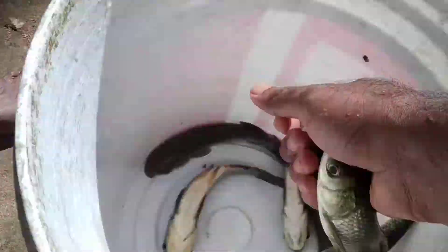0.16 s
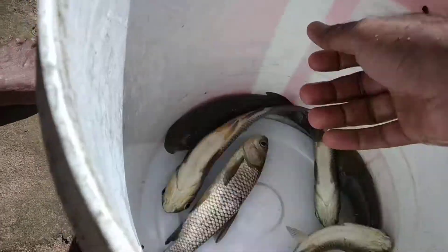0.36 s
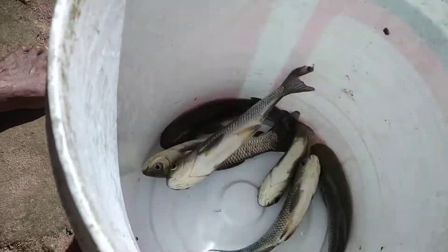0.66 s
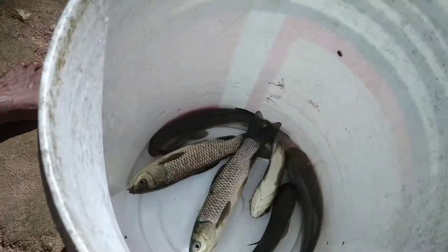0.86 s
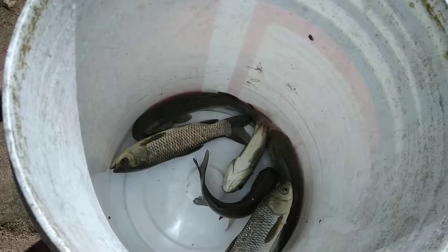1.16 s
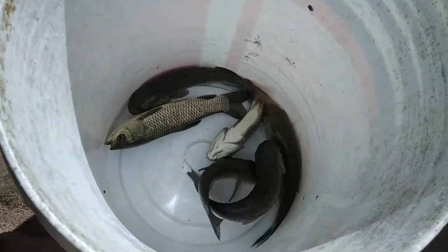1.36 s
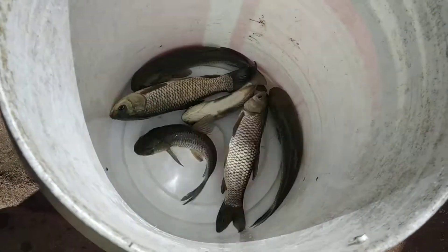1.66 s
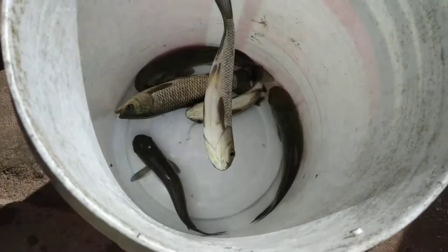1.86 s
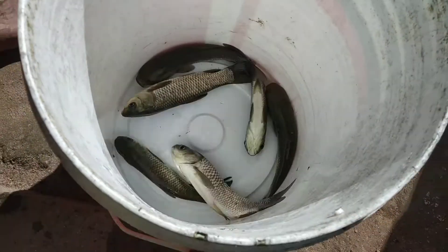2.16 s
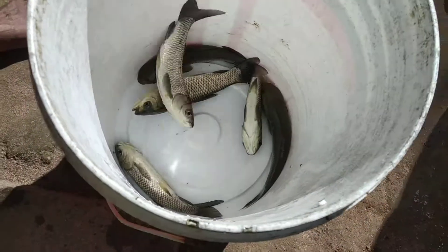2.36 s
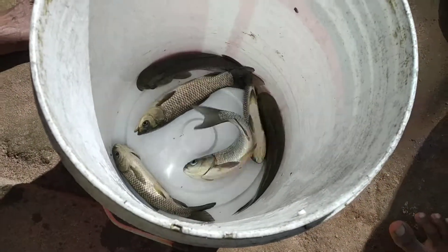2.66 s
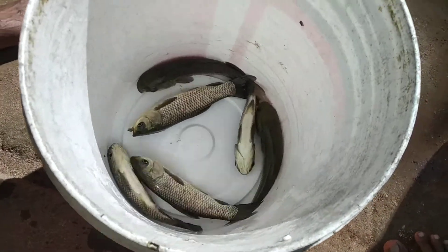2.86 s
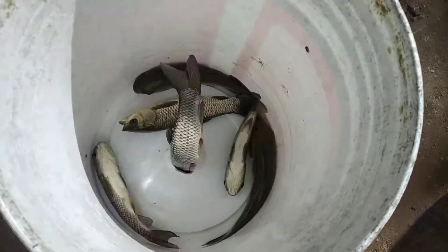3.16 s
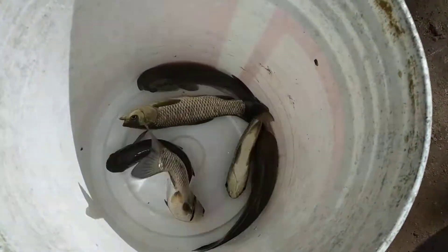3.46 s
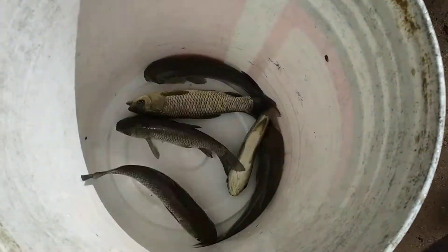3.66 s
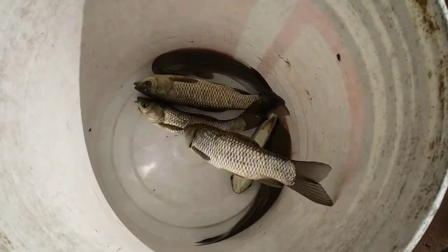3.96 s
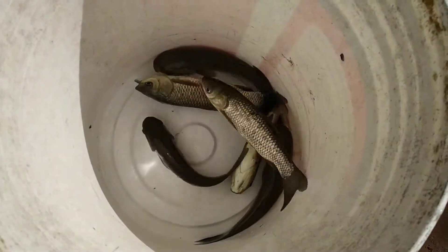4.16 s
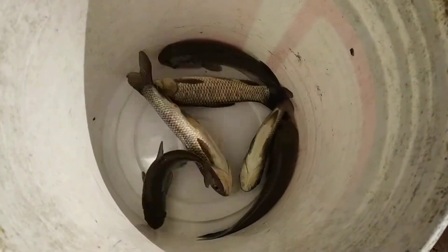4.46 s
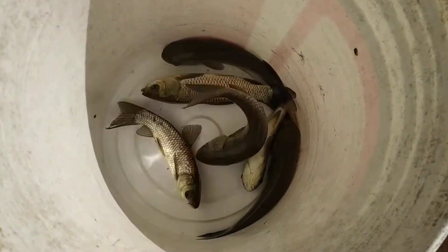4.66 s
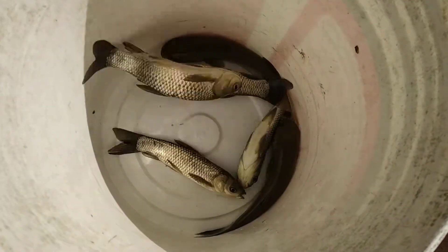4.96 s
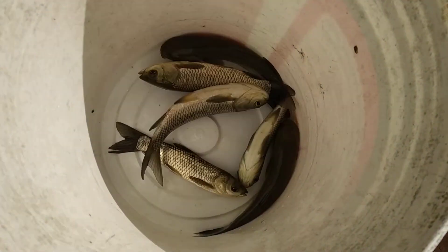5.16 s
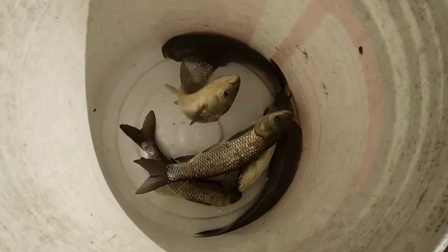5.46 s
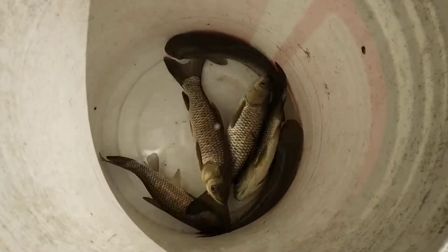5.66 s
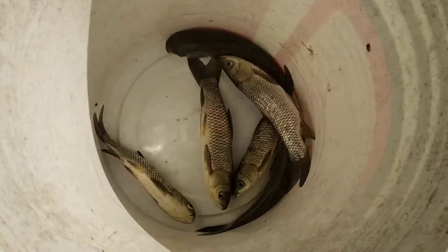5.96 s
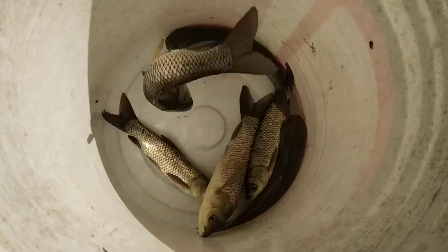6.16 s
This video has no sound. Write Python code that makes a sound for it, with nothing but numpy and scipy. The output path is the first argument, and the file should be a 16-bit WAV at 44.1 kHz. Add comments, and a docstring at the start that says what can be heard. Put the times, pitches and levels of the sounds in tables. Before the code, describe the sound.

Close stereo microphone over a plastic bucket outdoors. Several live fish flop without pause: low hollow thuds on the bottom, short knocks on the wall, crisp wet slaps and slithering squelches, in rapid uneven bursts. Early on the left side twice overloads with a heavy thump and briefly dulls. A small bird cheeps hoarsely far away about once a second over a soft low rumble.

```python
"""Fish flapping in a plastic bucket

Bodies thud on the bottom and ring the air in the bucket, both built from damped modes; raps set the wall ringing.
Wet tails and scales slap, slither and squelch on the wall: grainy shaped noise with banded pops and tiny damped
pops. A small bird cheeps far off, two swept sines heard through echoes, over a low outdoor rumble of shaped noise.
Early on the left microphone port is knocked into overload twice, sticking at its limit and sagging back.
"""
import sys
import numpy as np
from scipy import signal
from scipy.fft import rfft, irfft, next_fast_len
from scipy.io import wavfile
from scipy.ndimage import uniform_filter1d, map_coordinates

SR = 44100
rng = np.random.default_rng(int(sys.argv[2]) if len(sys.argv) > 2 else 0)


def to_wav(s):
    """Save 16-bit WAV."""
    ch = np.atleast_2d(s).T  # columns
    pcm = np.round(np.clip(ch, -1, 1) * 32767)  # PCM
    wavfile.write(sys.argv[1], SR, pcm.astype(np.int16))


N = 278697  # length in samples

# bodies landing on the bottom: t/s, air ring level/dB, bottom thud level/dB
LANDINGS = [(0.082, -28, -18.5), (0.0923, -10.5, -7.5), (0.1982, -11, -26), (0.28, -15, -12),
            (0.3014, -10, -27), (0.32, -15, -13), (0.3793, -10.5, -17.5), (0.4279, -15.5, -14.5),
            (0.4756, -18.5, -25), (0.5418, -18.5, -23), (0.6491, -17.5, -17), (0.7616, -16, -6.5),
            (0.779, -13.5, -10.5), (0.8586, -28, -27), (0.903, -26, -31), (0.9296, -23, -36),
            (1.15, -18.5, -44), (1.232, -13, -8), (1.3386, -23, -26), (1.4323, -18, -44), (1.538, -26, -18),
            (1.548, -22, -18), (1.571, -37, -20), (1.591, -9, -14.5), (1.668, -14.5, -27),
            (1.786, -25, -35), (1.951, -9, -12), (2.03, -2.5, -10), (2.0547, -32, -28), (2.0905, -5.5, -12),
            (2.171, -22, -24), (2.1941, -15, -16), (2.2201, -6.5, -14.5), (2.3707, -21.5, -32),
            (2.396, -22, -24), (2.4599, -1.5, -15.5), (2.641, -23, -27), (2.6919, -23, -21.5),
            (2.7929, -19, -39), (2.8172, -22.5, -34), (3.0463, -34, -29), (3.1606, -19, -25),
            (3.296, -20, -10), (3.349, -18, -15), (3.45, -12, -18), (3.5749, -6.5, -15), (3.702, -15, -21),
            (3.7788, -22, -28), (3.8227, -18.5, -41), (4.123, -30, -18), (4.1695, -22, -11.5),
            (4.239, -16.5, -43), (4.3695, -6, -10.5), (4.4376, -25, -21.5), (4.4687, -5.5, -21),
            (4.5754, -22, -22), (4.713, -10, -15), (4.787, -33, -14), (4.8331, -4, -8.5),
            (5.0279, -30, -14.5), (5.097, -20, -13), (5.184, -22, -14), (5.199, -16.5, -18),
            (5.258, -24, -22), (5.2956, -37, -20), (5.3264, -21, -27), (5.4482, -20.5, -17.5),
            (5.5117, -25, -20.5), (5.822, -28.5, -24), (6.0236, -21.5, -34), (6.1428, -19, -26),
            (6.2937, -7.5, -16)]
# colour of wet hiss: f/Hz, relative density/dB per Hz
HISS_COLOUR = [(3500, -26), (5000, -8.5), (6500, -2.5), (8800, 4), (10500, 0), (12000, -15), (14000, -25)]
# colour of the topmost wet sizzle: f/Hz, relative density/dB per Hz
SIZZLE_COLOUR = [(9500, -12), (11500, -0.5), (14000, -4), (16000, -9.5)]


def amp(db):
    """Decibels to a linear factor."""
    return np.exp(np.asarray(db) * float(np.log(10) / 20))


def unit(x):
    """x scaled to rms 1."""
    return x / np.sqrt(np.mean(x ** 2) + 1e-20)


def along(points, hz):
    """A curve through (Hz, value) points on a log frequency axis."""
    f, v = np.transpose(points)
    return np.interp(np.log(hz + 1), np.log(f + 1), v)


def wobble(rate):
    """A smooth random curve, rate knots a second."""
    return map_coordinates(rng.standard_normal(int(N * rate / SR) + 4), [np.arange(N) * rate / SR])


def filtered(x, response):
    """x with its spectrum times a complex response of frequency."""
    m = next_fast_len(N + SR // 2)
    return irfft(rfft(x, m) * response(np.fft.rfftfreq(m, 1 / SR)), m)[..., :N]


def rush(spectrum, grain_db=0, grain_rate=900, patchy_db=0):
    """Stereo noise of rms 1, alike in the bass; grains roughen both sides together, patches make its colour lumpy."""
    # likeness of the two sides: f/Hz, left-right correlation (below zero counts as unrelated)
    likeness = [(60, 0.92), (130, 1), (290, 0.9), (640, 0.69), (1410, -0.22), (3100, -0.21), (6820, -0.74),
                (15000, -0.42)]
    turn = lambda hz: np.arccos(np.clip(along(likeness, hz), 0, 1)) / 2
    closed = [(1, -120)] + list(spectrum) + [(SR / 2, -120)]  # fade out at both ends
    z = signal.stft(rng.standard_normal((2, N)), nperseg=256)[2]
    field = uniform_filter1d(rng.standard_normal(z.shape[1:]), size=4, axis=0)
    field = uniform_filter1d(field, size=5, axis=1)
    patchy = signal.istft(z * amp(patchy_db * unit(field)), nperseg=256)[1][:, :N]
    grainy = patchy * amp(grain_db * wobble(grain_rate))
    mid, side = filtered(grainy, lambda hz: amp(along(closed, hz)) * [np.cos(turn(hz)), np.sin(turn(hz))])
    return unit(np.array([mid + side, mid - side]))


def ring(modes, t, scatter_db, detune):
    """Damped modes, each at a new strength and slightly new pitch; the first swing is a rarefaction."""
    draw = rng.standard_normal((2, len(modes)))
    hz, db, t60 = np.transpose(modes)[:, :, None]
    hz = hz * (1 + detune * draw[0, :, None])
    level_db = np.float32(db + scatter_db * draw[1, :, None] - 60 * t / t60)
    phase = np.float32(2 * np.pi * hz * t)
    return -np.sum(amp(level_db) * np.sin(phase), axis=0)


def outdoors():
    """Low outdoor rumble: patchy noise, mostly bass, whose level drifts slowly."""
    # colour of the rumble: f/Hz, relative density/dB per Hz
    rumble_colour = [(15, -29), (28, -12), (42, -3), (50, 3.5), (62, -0.5), (95, -6), (220, -23),
                     (330, -24.5), (1100, -26.5), (3000, -33), (4500, -45.5), (6400, -40.5), (11000, -48),
                     (16000, -41)]
    level_db = -40 + wobble(2.24)
    return amp(level_db) * rush(rumble_colour, patchy_db=5.5)


def restless_db():
    """How much the fish wriggle, one value per sample."""
    # wriggling between the blows: t/s, restlessness/dB
    wriggling = [(0.0, -45), (0.37, -41.5), (1.09, -56.5), (1.44, -42.5), (1.95, -53), (2.16, -43.5),
                 (2.52, -53), (2.94, -54), (3.57, -56), (4.08, -55), (4.4, -52), (5.579, -45), (6.32, -48)]
    return np.interp(np.arange(N) / SR, *np.transpose(wriggling))


def squelch(count):
    """Tiny wet pops at random moments: a few damped cycles each, most of them faint."""
    when, pitch, size, side = rng.random((count, 4)).T[:, :, None]
    hz, t = 500 * 7 ** pitch, np.arange(400) / SR
    level_db = -7 * np.log(size + 0.025) - 6 * pitch - 23 * hz * t  # loses 23 dB a cycle
    pops = amp(level_db) * np.sin(2 * np.pi * hz * t) * np.clip(hz * t, 0, 1)
    at = ((when * N).astype(int) + np.arange(400)).ravel()
    shares = (1.0 + side, 1.3 - side)  # left, right
    return unit(np.array([np.bincount(at, (pops * share).ravel(), N + 400)[:N] for share in shares]))


def wriggle():
    """Scales slither, flanks rub and squelch on the wall and small movements keep the air in the bucket humming."""
    # colour of flanks rubbing the wall: f/Hz, relative density/dB per Hz
    rub_colour = [(250, -42), (400, -3), (740, -4), (765, 6.5), (800, -8.5), (1300, -8), (3000, -9.5),
                  (5000, -12.5)]
    # colour of the stirred air in the bucket: f/Hz, relative density/dB per Hz
    stir_colour = [(60, -36), (100, -12.5), (170, -17), (210, -11), (245, -20), (330, -53)]
    restless = restless_db()
    # slither, rubbing and stirred air all follow the same restlessness
    slither_db, rub_db, stir_db = restless - 1.5, restless - 1, restless + 9
    fidget = wobble(35)
    slither = rush(HISS_COLOUR, grain_db=4, grain_rate=400, patchy_db=3)
    slither = slither + 0.4 * rush(SIZZLE_COLOUR, grain_db=5, grain_rate=600, patchy_db=4)
    rub = rush(rub_colour, grain_db=-1.0, grain_rate=160, patchy_db=5.0) + 0.57 * squelch(count=700)
    stir = rush(stir_colour, grain_db=3.5, grain_rate=30)
    return amp(slither_db + 3.6 * fidget) * slither + amp(rub_db + 4.26 * fidget) * rub + amp(stir_db) * stir


def chance(count):
    """Rows (s, three normal draws) for faint contacts, denser while the fish are restless."""
    odds = np.cumsum(amp(restless_db()))
    when = np.interp(rng.random(count), odds / odds[-1], np.arange(N) / SR)
    return np.column_stack([when, rng.standard_normal((count, 3))])


def thuds():
    """Each landing first sucks at the air in the bucket and rings it; the bottom swings back a moment later."""
    # air in the bucket: f/Hz, level/dB, t60/s
    air_modes = [(210.1, -2.5, 0.22), (187, -9, 0.089), (240, -9, 0.03), (290, -28, 0.2),
                 (340.6, -30, 0.26)]
    # bottom on the ground: f/Hz, level/dB, t60/s
    bottom_modes = [(102.1, -1, 0.11), (129.8, -3.5, 0.1), (67, -21, 0.038)]
    nudge_db = -32.5  # faint chance bumps on the bottom
    out, t = np.zeros(N + SR), np.arange(SR // 4) / SR
    soft = 1 - np.exp(-t / 0.0022)  # flesh spreads the contact
    late = np.clip(t - 0.001, 0, None)
    nudges = [(s, nudge_db + 4 * a, nudge_db + 2.5 + 4 * b) for s, a, b, c in chance(count=14)]
    for s, air_db, thud_db in [*LANDINGS, *nudges]:
        air = amp(air_db) * ring(air_modes, t, 0.39, 0.0079)
        bottom = amp(thud_db) * ring(bottom_modes, late, 0.84, 0.1)
        out[round(s * SR):][:len(t)] += soft * (air - bottom)
    restless = amp(2.2 * wobble(45))  # moving fish keep disturbing the ring
    # deep bass below about 35 Hz rolls off
    trimmed = filtered(restless * out[:N], lambda hz: (1j * hz / (1j * hz + 35)) ** 2)
    apart = np.array([[0.00012], [-0.00012]])  # seconds; the ports sit a few centimetres apart
    return filtered(trimmed, lambda hz: np.exp(2j * np.pi * hz * apart)) * amp([[0.7], [-0.7]])


def raps():
    """The raps and a rattle on the wall after each landing as rows (s, dB, Hz)."""
    # heads, fins and tails rapping the wall: t/s, level/dB, f/Hz
    wall_raps = [(0.0936, -19, 730), (0.1982, -10, 1015), (0.2825, -21.5, 780), (0.3153, -19, 824),
                 (0.354, -21, 1090), (0.3801, -11, 890), (0.3888, -14.5, 780), (0.4316, -25, 814),
                 (0.6503, -22.5, 1250), (0.7699, -19, 830), (0.7911, -20, 700), (0.8007, -16.5, 800),
                 (0.9101, -20, 770), (1.2321, -17, 685), (1.238, -15.5, 750), (1.4357, -14, 1050),
                 (1.5919, -23, 860), (1.635, -20.5, 746), (1.6501, -23, 1160), (1.9448, -22, 895),
                 (1.9528, -23, 800), (2.0291, -7.5, 845), (2.0571, -25, 820), (2.0888, -25, 840),
                 (2.0969, -20.5, 706), (2.1128, -25, 670), (2.1405, -30, 790), (2.2194, -25.5, 660),
                 (2.2477, -21.5, 970), (2.2545, -20, 1070), (2.3895, -21.5, 1250), (2.4167, -23.5, 790),
                 (2.4604, -12.5, 1100), (2.8011, -21, 1000), (3.2956, -20, 1470), (3.3483, -21.5, 630),
                 (3.3736, -22, 654), (3.5755, -19, 590), (3.7131, -14, 720), (3.7558, -22, 750),
                 (3.988, -22, 726), (4.116, -22.5, 1410), (4.1715, -21, 1210), (4.2333, -19, 1200),
                 (4.3708, -5, 723), (4.4676, -12, 620), (4.5663, -20.5, 680), (4.705, -28, 625),
                 (4.8111, -17, 970), (4.8331, -13, 630), (5.2, -16.5, 684), (5.8109, -17.5, 600),
                 (5.8709, -26.5, 1170), (6.1436, -15.5, 700), (6.2603, -18, 1170), (6.2872, -10.5, 660)]
    delay_s, spread_s, under_db, rattle_hz = 0.01, 0.015, 22, 760  # under the louder part of the landing
    draw = rng.random((len(LANDINGS), 2))
    rattles = [(s + delay_s + spread_s * a, max(air, thud) - under_db, rattle_hz * 1.54 ** (b - 0.5))
               for (s, air, thud), (a, b) in zip(LANDINGS, draw) if s + delay_s + spread_s < N / SR]
    return [*wall_raps, *rattles]


def knocks():
    """A short rap at its own pitch sets the wall ringing; each port hears the wall a little differently."""
    # plastic wall: f/Hz, level/dB, t60/s
    wall_modes = [(365.5, -23, 0.12), (554.3, -23, 0.12), (645, -13, 0.035), (761, -26, 0.25),
                  (798, -32.5, 0.17), (942, -18.5, 0.039), (1232, -23.5, 0.078), (1707, -20, 0.02),
                  (2060, -25, 0.053)]
    out, t = np.zeros((2, N + SR)), np.arange(SR // 7) / SR
    contact = 1 - np.exp(-t / 0.00083)
    for s, db, hz in raps():
        shared = ring([(hz, 1.5, 0.014)], t, 0.6, 0.03) + ring(wall_modes, t, 3, 0.012)
        ports = np.array([shared + 0.8 * ring(wall_modes, t, 6.4, 0.0576) for port in range(2)])
        out[:, round(s * SR):][:, :len(t)] += amp(db) * contact * ports
    damping = amp(1.27 * wobble(60))  # fish against the wall damp it on and off
    return out[:, :N] * amp([[0.8], [-0.8]]) * damping


def wet_contacts():
    """Slaps, slides and chance ticks as rows (s, hiss dB, smack dB, smack Hz, rise ms, fall ms)."""
    # wet slaps: t/s, hiss level/dB, smack level/dB, smack f/Hz, time to fall by 12 dB/ms
    slap_hits = [(0.1989, -21, -23, 1490, 11.5), (0.244, -14.5, -34, 3060, 10),
                 (0.2842, -8, -20.5, 4680, 5.5), (0.3394, -22, -32, 1500, 12),
                 (0.3712, -23, -31.5, 3290, 27), (0.4682, -13.5, -35.5, 1500, 3.5),
                 (0.5095, -27.5, -41, 1440, 7.5), (0.648, -28, -21, 1425, 9), (0.73, -28.5, -52, 1490, 6),
                 (0.7606, -24, -32, 1480, 3.5), (0.776, -26.5, -35, 1500, 10.5),
                 (0.9118, -8, -19, 5650, 1.15), (0.943, -17, -29, 5340, 2.7), (0.985, -32, -41, 4000, 3),
                 (1.149, -31, -36, 2500, 4), (1.2315, -14.5, -25, 1440, 6.4),
                 (1.2509, -9.5, -18, 4460, 4.5), (1.3869, -15, -31, 1490, 5.8),
                 (1.4342, -11, -18, 1500, 6.5), (1.4956, -20, -38, 5600, 5), (1.5048, -24, -47, 5490, 1),
                 (1.542, -20.5, -31, 2690, 2), (1.564, -34, -24.5, 2600, 6.5),
                 (1.6086, -21.5, -36, 3020, 2.5), (1.6513, -14.5, -24, 2630, 1.7),
                 (1.668, -24, -36, 1520, 4), (1.725, -29, -55, 4000, 1), (1.7785, -18.5, -39, 5360, 4.5),
                 (1.7881, -20, -31.5, 2460, 6), (1.9462, -20.5, -28, 1536, 9.1),
                 (2.0303, -29.5, -22, 1520, 2), (2.1377, -36, -29, 4680, 8.5),
                 (2.148, -24.5, -28.5, 5160, 6.5), (2.193, -29, -44, 1540, 12), (2.2448, -40, -26, 1570, 8),
                 (2.2556, -12, -19.5, 2180, 5), (2.3211, -18.5, -25, 4370, 4), (2.407, -25, -47, 4500, 5.5),
                 (2.5614, -28, -29.5, 2970, 5.5), (2.6577, -14.5, -34, 5340, 3),
                 (2.8035, -18, -27, 1480, 3), (2.86, -33.5, -46, 3980, 2), (3.049, -13.5, -35, 5020, 2),
                 (3.0964, -33, -50, 4260, 5), (3.1156, -23, -36, 5000, 2.5), (3.257, -30.5, -42, 4000, 4),
                 (3.2956, -30, -31.5, 1565, 17), (3.383, -16.5, -41, 5740, 4.1), (3.414, -17, -41, 5300, 5),
                 (3.5774, -26, -34, 1530, 3.5), (3.716, -8.5, -24.5, 2840, 1.3), (3.801, -31, -42, 4000, 3),
                 (3.8372, -26, -31, 4300, 5.5), (3.8516, -19.5, -29, 1505, 1.6),
                 (3.9916, -11.5, -28.5, 4310, 2.3), (4.144, -33, -44, 1500, 6), (4.1627, -28, -33, 1880, 8),
                 (4.1734, -21.5, -19, 1610, 6.5), (4.226, -15, -24.5, 3140, 2),
                 (4.2362, -17.5, -18, 1540, 1.6), (4.355, -32, -44, 3000, 5), (4.371, -25, -46, 1500, 1),
                 (4.3939, -25, -39, 1500, 6.5), (4.468, -41, -28.5, 1500, 6), (4.5672, -14, -25, 1520, 1.5),
                 (4.6317, -28.5, -43, 3000, 5), (4.734, -27, -39, 1500, 3), (4.7794, -34, -21.5, 3630, 2),
                 (4.812, -9.5, -28.5, 1470, 3.8), (4.833, -14, -22, 1480, 2.7),
                 (4.9521, -15, -25.5, 2100, 2), (5.0313, -16.5, -30, 1895, 5),
                 (5.2943, -13.5, -39, 1590, 1), (5.31, -19, -21, 1910, 4.3), (5.3546, -25, -40, 1590, 3),
                 (5.4482, -14.5, -50, 5300, 1.7), (5.526, -23.5, -38, 2090, 4.5),
                 (5.6963, -8.5, -27.5, 5740, 3), (5.7028, -10, -22.5, 5000, 2.3),
                 (5.827, -33, -42, 3020, 2), (5.8711, -24.5, -22.5, 1840, 7.5), (6.0263, -8, -28, 3800, 2),
                 (6.0343, -19, -28, 2090, 6.5), (6.0887, -17.5, -42, 2900, 2.9),
                 (6.1447, -10.5, -21.5, 5390, 3.5), (6.2611, -22, -27.5, 1375, 4.5),
                 (6.2918, -10.5, -22.5, 1500, 1.5)]
    # flanks sliding along the wall: t of the peak/s, hiss level/dB, time to swell and again to fade by 12 dB/ms
    slides = [(0.114, -27, 37), (0.179, -36, 11), (.323, -27, 8), (.38, -15.5, 19.5), (.595, -39.5, 20),
              (.687, -32, 11), (1.1634, -25, 11), (1.226, -33, 17), (1.3794, -17, 5.5), (1.684, -30.5, 19),
              (2.06, -32, 14), (2.086, -26, 12.5), (2.39, -30, 7), (2.648, -28, 10), (2.718, -24.5, 7.5),
              (2.789, -32, 6.5), (3.36, -29.5, 9.5), (3.391, -21.5, 13), (4.119, -30, 16), (4.416, -23, 12),
              (4.547, -33, 12), (4.724, -29.5, 6.5), (5.041, -24.5, 2), (5.285, -26, 12), (5.328, -30, 16),
              (5.548, -34, 11), (5.6284, -18, 5), (5.993, -26.5, 14)]
    rise_ms = 0.91  # slaps and ticks rise by 12 dB
    slide_smack_under_db, slide_smack_hz = 13, 1505
    tick_db, tick_ms = -41, 4  # faint wet ticks on the wall
    hits = [(s, hiss, smack, hz, rise_ms, ms) for s, hiss, smack, hz, ms in slap_hits]
    strokes = [(s, hiss, hiss - slide_smack_under_db, slide_smack_hz, ms, ms) for s, hiss, ms in slides]
    ticks = [(s, tick_db + 3 * a, tick_db - 7.5 + 3 * b, 2500 * 1.8 ** np.clip(c, -2, 2), rise_ms, tick_ms)
             for s, a, b, c in chance(count=14)]
    return hits + strokes + ticks


def slaps():
    """Wet skin meets and leaves the plastic: grainy bursts that swell, peak and linger in the bucket."""
    # colour of the smack: f/Hz, relative density/dB per Hz
    smack_colour = [(500, 2), (1200, -0.5), (2500, 4), (4000, 0.5), (6000, -7.5)]
    sizzle_under_db, sizzle_scatter_db = 7.5, 0.5  # under the hiss
    lead = SR // 20  # each burst starts this many samples ahead of its peak
    power, smack = np.zeros((3, 2, N + SR)), np.zeros((2, N + SR))
    t = np.arange(-SR // 20, SR // 8) / SR
    for s, hiss_db, smack_db, smack_hz, rise_ms, fall_ms in wet_contacts():
        here = slice(round(s * SR), round(s * SR) + len(t))
        sizzle_db = hiss_db - sizzle_under_db + sizzle_scatter_db * rng.standard_normal()
        burst = amp(12 * np.where(t < 0, t / rise_ms, -t / fall_ms) * 1000)
        burst = burst + (t > 0) * amp(-26.5 - 60 * t / 0.29)  # echoes between the walls
        pan_db = rng.normal(0, 0.33) * np.array([1, -1])
        level = amp(np.array([hiss_db, smack_db - 2, sizzle_db])[:, None] + pan_db)
        power[..., here] += (level[..., None] * burst) ** 2
        # the pocket of air under the skin pops: noise in a band around its pitch
        slow = uniform_filter1d(rng.standard_normal((2, 2, len(t))), size=int(2.5 * SR / smack_hz))
        slow = uniform_filter1d(slow, size=int(SR / smack_hz))
        turn = 2 * np.pi * smack_hz * t
        pop = slow[0] * np.cos(turn) + slow[1] * np.sin(turn)
        smack[:, here] += amp(smack_db - 2.5) * burst * unit(pop)  # the pop's share
    levels = np.sqrt(power[..., lead:][..., :N])
    colours = (HISS_COLOUR, smack_colour, SIZZLE_COLOUR)
    spray = sum(level * rush(colour, grain_db=2.5, grain_rate=1200, patchy_db=4.5)
                for level, colour in zip(levels, colours))
    return spray + smack[:, lead:][:, :N]


def bird():
    """Hoarse cheeps with a strong octave, heard only through the echoes of the trees, unrelated at the two ports."""
    # cheeps: t/s, length/s, f/Hz, fundamental level/dB, octave level/dB
    cheeps = [(0.871, 0.064, 3260, -47.5, -40.5), (1.858, 0.055, 3230, -43, -39),
              (2.729, 0.063, 3190, -42, -37), (3.795, 0.034, 3240, -47, -42),
              (4.876, 0.085, 3180, -47, -46.5), (5.858, 0.041, 3260, -39.5, -34)]
    call = np.zeros(N + SR)
    for s, length, hz, db, octave_db in cheeps:
        t = np.arange(round(length * SR)) / SR
        waver = unit(uniform_filter1d(rng.standard_normal(len(t)), size=200))  # hoarseness
        sweep = hz * (1.02 - 0.0282 * t / length + 0.0532 * waver)
        phase = 2 * np.pi * np.cumsum(sweep) / SR
        voice = amp(db) * np.sin(phase) + amp(octave_db) * np.sin(2 * phase)
        call[round(s * SR):][:len(t)] += np.sin(np.pi * t / length) ** 0.083 * voice
    echoes = rng.standard_normal((2, SR // 2)) * amp(-60 * np.arange(SR // 2) / SR / 0.42)  # t60 0.42 s
    return signal.fftconvolve(call[None], echoes / np.linalg.norm(echoes[0]), axes=1)[:, :N]


def scene():
    """All sources summed at the two microphone ports."""
    return outdoors() + wriggle() + thuds() + knocks() + slaps() + bird()


def record(dry):
    """The left capsule sticks at its limit and sags back through the coupling filter; soft clipping, band limit."""
    # left port stuck at its limit: from t/s, to t/s, step size (linear)
    overloads = [(.2015, .2122, 1.1), (.2448, .2533, 1.4)]
    top_hz = 16500
    t = np.arange(N) / SR
    edge = lambda s: np.clip((t - s) / 0.0011, 0, 1)
    held = sum(size * (edge(start) - edge(stop)) for start, stop, size in overloads)
    dazed = np.interp(t, [0.2, 0.203, 0.256, 0.29], [0.94, 0.073, 0.044, 0.92])  # the stuck capsule hears little
    sag = filtered(held, lambda hz: (1j * hz / (1j * hz + 2.4)) ** 2)
    wet = np.array([dazed * dry[0] + sag, dry[1]])
    wet = wet / (1 + np.abs(wet / 1.02) ** 8) ** (1 / 8)  # soft clipping
    return filtered(wet, lambda hz: hz < top_hz)


dry = scene()
out = record(dry)
to_wav(out)
```